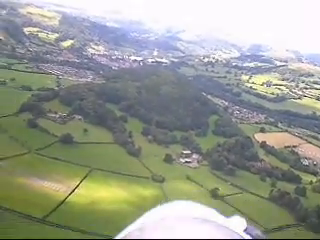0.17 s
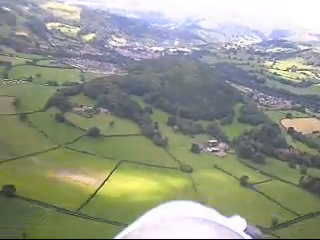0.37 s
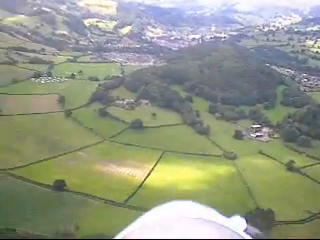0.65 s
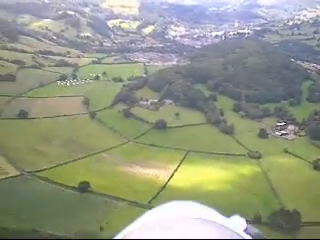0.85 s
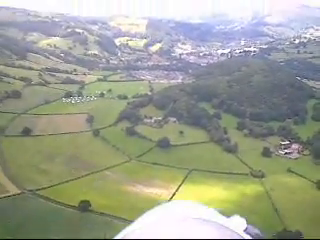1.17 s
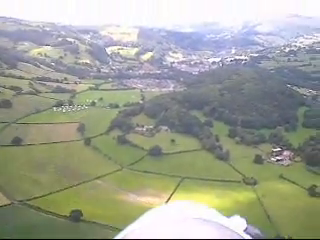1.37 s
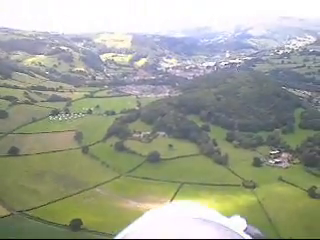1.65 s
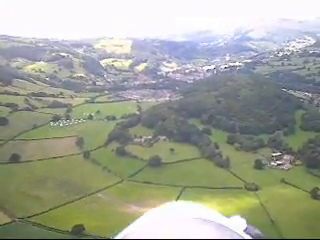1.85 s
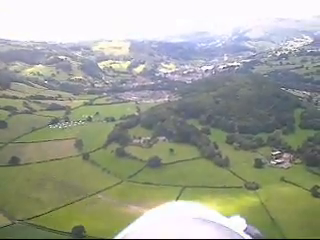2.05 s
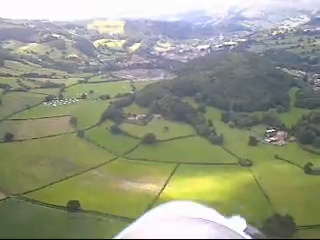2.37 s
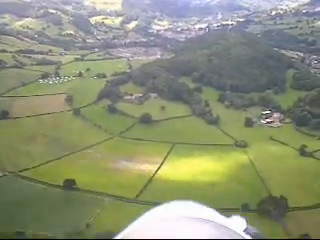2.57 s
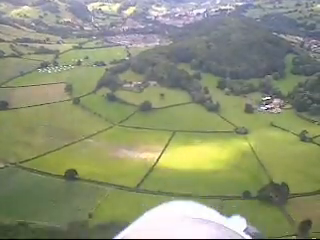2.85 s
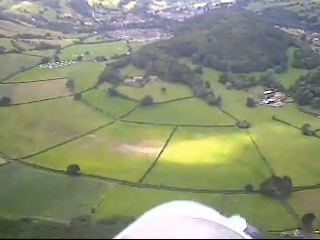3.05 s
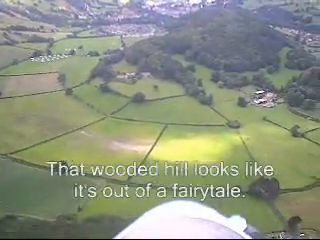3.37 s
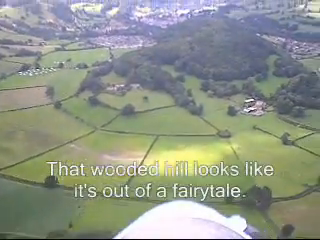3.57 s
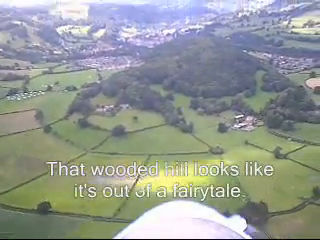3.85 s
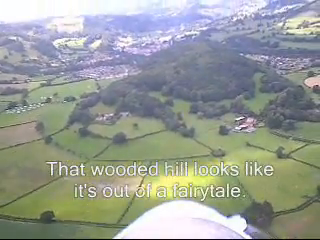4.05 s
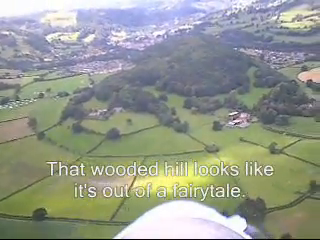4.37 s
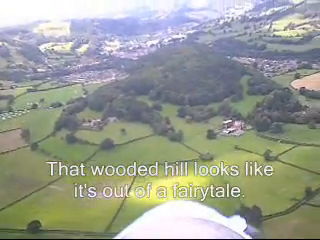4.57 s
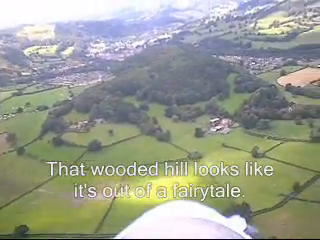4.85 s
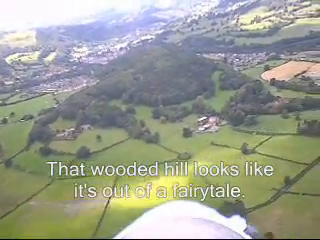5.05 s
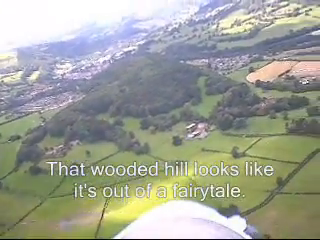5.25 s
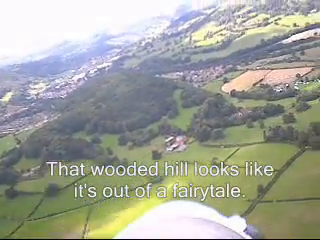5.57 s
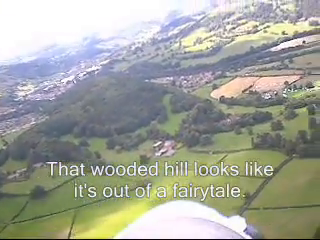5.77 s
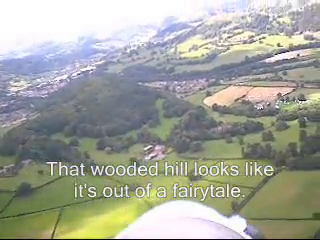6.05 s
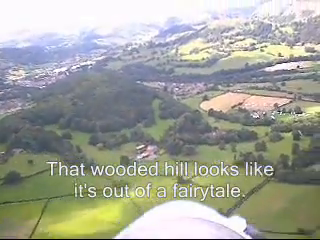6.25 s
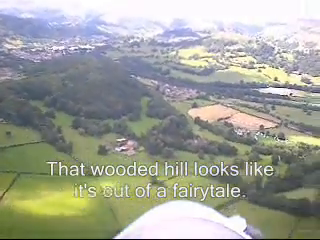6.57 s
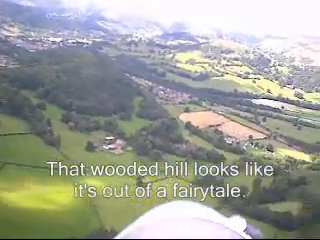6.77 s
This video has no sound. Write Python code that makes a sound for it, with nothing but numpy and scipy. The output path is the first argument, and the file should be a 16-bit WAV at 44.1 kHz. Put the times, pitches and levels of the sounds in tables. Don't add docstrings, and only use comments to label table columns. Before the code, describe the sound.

A close, low-quality microphone on a flying model glider is pummelled by air throughout. Deep, irregular buffeting clips into flat, crunchy thuds, with rougher mid-range rushing and a thin fizz above; slow sampling adds a gritty, metallic edge. From 0 to about 3.7 s a servo chatters almost continuously, some forty-five tiny twitches a second, each a short high gear whine and rattle, broken by little gaps. Stronger zips stand out near 0.1, 0.3, 0.9, 1.3, 1.5, 1.8, 2.1 and 3.45 s. The wind repeatedly fades for a fraction of a second, notably around 0.5, 0.6, 2.0, 2.4 and 3.0 s, exposing the servo, then bursts back. From 3.7 s the airflow swells and saturates, with a sharp slap at 4.15 s and brief drops near 4.5, 4.8 and 5.05 s. The servo is weaker and mostly buried, though it still twitches, until the abrupt end at 6.9 s.

```python
import sys
import numpy as np
from scipy import signal
from scipy.fft import rfft, irfft, next_fast_len
from scipy.io import wavfile
from scipy.ndimage import uniform_filter1d, map_coordinates

SR = 44100
rng = np.random.default_rng(int(sys.argv[2]) if len(sys.argv) > 2 else 0)


def master_out(mix):
    frames = np.transpose(np.atleast_2d(mix))
    ceiling = np.clip(frames, -1, 1)
    pcm = np.round(ceiling * 32767).astype(np.int16)
    wavfile.write(sys.argv[1], SR, pcm)


def to_linear_factor(level_db):
    exponent = np.asarray(level_db, float) / 20
    return 10 ** exponent


N = 305160

# frequency in Hz, width in Hz, level in dB.
CASE_MODES = [(1126, 380, -9), (1600, 295, -10), (2610, 244, -13), (2860, 237, 0.5), (2833, 754, -4)]
WHEEL_HZ = (2570, 2880)
# start in seconds, end in seconds, usual twitch peak in dB.
STEERING = [(0, .21, -20.5), (.23, .3, -25), (.3, .47, -22), (.47, .63, -23.5), (.63, 1.0, -20.5),
            (1.0, 1.18, -19), (1.2, 1.33, -23), (1.4, 1.66, -17.5), (1.69, 1.91, -20.5), (1.92, 2.21, -21),
            (2.23, 2.43, -22.5), (2.56, 2.76, -20), (2.78, 2.87, -21.5), (2.87, 3.07, -20.5),
            (3.16, 3.31, -26.5), (3.31, 3.73, -20.5), (3.84, 4.14, -27), (4.3, 4.57, -29.5),
            (4.59, 4.78, -24.5), (4.92, 5.31, -30.5), (5.58, 5.83, -26.5), (5.83, 6.1, -23.5),
            (6.1, 6.46, -28), (6.47, 6.7, -23), (6.72, 6.92, -23)]
IDLE_S = (.0246, .2242, .948, 1.629, 1.959, 2.003, 2.048, 2.795, 2.838, 3.278, 3.938, 4.091, 4.333, 4.377,
          4.619, 4.664, 5.015, 5.082, 5.235, 5.829, 6.116, 6.4, 6.51, 6.532, 6.599, 6.62, 6.687)
# peak time in seconds, peak in dB, gear whine in Hz.
JERKS = [(0.0688, -15.5, 2630), (.0906, -17.5, 2930), (.3105, -15, 2760), (0.6414, -19, 2880),
         (0.8824, -15.5, 2800), (1.278, -13, 2680), (1.3212, -9, 2780), (1.5193, -7.5, 2750),
         (1.7607, -10, 2780), (1.784, -16, 2750), (2.0261, -16, 2610), (2.0698, -14.5, 2760),
         (2.092, -9, 2830), (2.1583, -13.5, 2780), (2.2893, -16, 2700), (2.3767, -16.5, 2860),
         (2.665, -18.5, 2680), (3.0364, -18, 2950), (3.235, -16.5, 2880), (3.4534, -12, 2880),
         (3.6535, -19, 2760), (3.916, -15, 2880), (3.9794, -15, 2740), (4.113, -17, 2750), (4.6, -17, 3080),
         (5.061, -26.5, 2910), (5.4327, -23, 3000), (6.159, -20, 2950), (6.555, -18.5, 3170),
         (6.6636, -23, 2480)]
# frequency in Hz, level in dB per Hz.
BUFFET_SPECTRUM = [(8, -8), (25, -1.5), (60, 3.5), (160, 2.5), (260, -6.5), (450, -25.5), (900, -48)]
# frequency in Hz, level in dB per Hz.
EDDY_SPECTRUM = [(100, -4.5), (220, 10), (300, 5.5), (600, -2.5), (900, -18), (1500, -35), (3000, -52)]
# frequency in Hz, level in dB per Hz.
FIZZ_SPECTRUM = [(400, 4), (800, 3.5), (1200, -4), (1800, -12), (3000, -21), (4500, -12)]
# time in seconds, strength in dB, extra fine turbulence in dB.
FLOW = [(0, -2.5, -0.5), (.3, -0.5, 5), (.7, 0, -1), (1.1, -1.5, 4), (1.6, -1, -0.5), (1.9, 0, -1),
        (2.2, -3, -2), (2.6, -1.5, -3), (3.0, 0, -2), (3.3, -1, -1.5), (3.7, 3.5, 0.5), (4.15, 4.5, 0.5),
        (4.55, 4, -1), (5.0, 2.5, 1), (5.4, 4.5, -1.5), (5.75, 2, 2), (6.3, 1.5, 1), (6.92, 2.5, 1.5)]
# deepest point in seconds, fading time in seconds,
# fall of eddies in dB, fall of buffet in dB.
LULLS = [(.24, 0.047, 5.5, 10.5), (.33, 0.078, 4, 4.5), (.405, .06, 3, 5), (.5, .05, 14, 1),
         (.6, 0.043, 15, 6), (.86, .07, 13, 3.5), (.95, 0.025, 8, 0.5), (1.005, 0.011, 5, 11),
         (1.682, 0.023, 14, 7), (2.045, 0.053, 11, 1), (2.299, .025, 8, 4), (2.43, 0.085, 9, 5.5),
         (2.56, .035, 11, 5), (2.615, .03, 9, 10.5), (2.75, .05, 11, 2), (2.89, 0.01, 13, 6),
         (2.99, 0.04, 15, 7), (3.08, 0.014, 15, 7), (3.146, 0.025, 4.5, 2), (3.27, 0.061, 2, 2),
         (3.8, .015, 9, 3), (4.31, 0.036, 8, 7.5), (4.525, 0.017, 16, 2), (4.777, 0.016, 21, 8),
         (5.061, 0.01, 24, 7.5), (5.87, 0.019, 7, 6), (6.305, .015, 6, 2.5), (6.41, 0.0091, 3, -3),
         (6.565, 0.0079, 2, -4), (6.679, 0.019, 12, -2)]
# time in seconds, peak in dB.
SLAPS = [(2.442, -31), (2.5084, -37), (3.092, -34), (3.147, -43), (3.277, -38), (3.498, -30), (4.1547, -9),
         (4.1676, -20), (4.1918, -19), (4.5324, -49), (4.8904, -41), (5.0394, -26), (5.319, -25),
         (5.8731, -54), (5.9495, -31), (6.146, -28), (6.1975, -44), (6.57, -45)]

CEILING = 0.347


def unit(x):
    return x / np.sqrt(np.mean(x ** 2) + 1e-20)


def filtered(x, response):
    m = next_fast_len(N + 8192)
    return irfft(rfft(x, m) * response(np.fft.rfftfreq(m, 1 / SR)), m)[:N]


def smooth(x, rows, columns):
    return uniform_filter1d(uniform_filter1d(x, size=rows, axis=0), size=columns, axis=1)


def wobble(rate_hz):
    return map_coordinates(rng.standard_normal(2000), [np.arange(N) * rate_hz / SR])


def twitches():
    frame_s, first_s = 0.021987, 0.0024
    jitter_s, scatter_db, gear_hz, gear_spread_hz = 0.0005, 1.5, 2855, 112
    chance = np.clip(rng.standard_normal((int(N / SR / frame_s) + 1, 3)), -1.5, 1.5)
    start_s = first_s + frame_s * np.arange(len(chance))
    peak_db = np.full(len(start_s), -120.)
    for start, end, usual_db in STEERING:
        peak_db[(start_s >= start) & (start_s < end)] = usual_db
    rows = np.c_[start_s + jitter_s * chance[:, 0],
                 peak_db + scatter_db * chance[:, 1],
                 gear_hz + gear_spread_hz * chance[:, 2]]

    def nearest(s):
        return np.round((np.asarray(s) - first_s) / frame_s).astype(int)

    rows[nearest(IDLE_S), 1] -= 14
    rows[nearest(np.transpose(JERKS)[0])] = JERKS
    return rows


def case_response(f):
    total = 0
    for k, (centre_hz, width_hz, db) in enumerate(CASE_MODES):
        damping = 1j * f * width_hz
        total = total + (-1) ** k * to_linear_factor(db) * damping / (centre_hz * centre_hz - f * f + damping)
    return total


def servo():
    s, db, hz = np.transpose(twitches())[:, :, None]
    chance = rng.random((len(s), 6))
    u = np.arange(-300, 600) / SR
    rise_s = 0.0012 * (1.0 + 0.63 * chance[:, :1])
    fall_s = 0.0019 * (0.78 + 0.24 * chance[:, 1:2])
    kick = np.where(u < 0, np.exp(-(u / rise_s) ** 2 / 2), np.exp(-(np.abs(u) / fall_s) ** 0.93))

    low_hz, high_hz = np.minimum(hz, WHEEL_HZ[0]), np.maximum(hz, WHEEL_HZ[1])
    share = (hz - low_hz) / (high_hz - low_hz)
    phase = 2 * np.pi * chance[:, 2:3]
    slip = 1 + 0.031 * (chance[:, 3:5] - 0.5)
    low_wheel = np.sin(2 * np.pi * low_hz * slip[:, :1] * u + phase)
    high_wheel = np.sin(2 * np.pi * high_hz * slip[:, 1:] * u + phase)
    whine = (1 - share) * low_wheel + share * high_wheel

    at = np.clip(np.round((s + u) * SR).astype(int), 0, N - 1).ravel()
    tone = np.bincount(at, (to_linear_factor(db) * kick * whine).ravel(), N)
    run_on = 0.26 * (u > 0) * np.exp(-np.abs(u) / 0.0066)
    rattle_level = to_linear_factor(13 * (chance[:, 5:] - 1.0)) * kick + run_on
    rattle = np.bincount(at, (to_linear_factor(db) * rattle_level).ravel(), N)
    return to_linear_factor(1.0) * tone + to_linear_factor(16.5) * filtered(rattle * rng.standard_normal(N), case_response)


def rush(spectrum, patchy_db):
    z = signal.stft(rng.standard_normal(N), nperseg=1024)[2]
    patches = unit(smooth(rng.standard_normal(z.shape), 6, 4))
    x = signal.istft(z * to_linear_factor(patchy_db * patches), nperseg=1024)[1][:N]
    hz, db = np.transpose(spectrum)
    x = filtered(x, lambda f: to_linear_factor(np.interp(np.log(f + 1), np.log(hz), db, -120, -120)))
    power = np.abs(uniform_filter1d(uniform_filter1d(x ** 2, size=3000), size=3000))
    return unit(x / power ** 1.25)


def lulls():
    return_s = 0.012
    t = np.arange(0, N / SR, 0.001)
    falls = []
    for s, fade_s, *depths_db in LULLS:
        shape = np.exp(-np.where(t < s, (s - t) / fade_s, (t - s) / return_s) ** 2)
        falls.append(np.outer(depths_db, shape))
    return [np.interp(np.arange(N) / SR, t, db) for db in np.max(falls, axis=0)]


def airflow():
    s, *controls = np.transpose(FLOW)
    strength_db, fine_db = (np.interp(np.arange(N) / SR, s, db) for db in controls)
    eddy_lull_db, buffet_lull_db = lulls()
    buffet_db = -17 + 0.33 * strength_db - buffet_lull_db
    eddy_db = -21 + 0.86 * strength_db - eddy_lull_db
    fizz_db = -37 + 1.5 * strength_db + fine_db - 0.39 * eddy_lull_db
    speed_db = uniform_filter1d(buffet_db, size=SR // 4)
    overload_db = 0.94 * np.maximum(speed_db + 21.5, 0)

    gust, lumps = wobble(22), wobble(70)
    buffet = unit(to_linear_factor(1.35 * gust) * rush(BUFFET_SPECTRUM, patchy_db=-1.0))
    eddies = unit(to_linear_factor(1.24 * gust + 1.63 * lumps) * rush(EDDY_SPECTRUM, patchy_db=0.5))
    flicker_db = 1.95 * gust + 0.85 * lumps + 3.6 * wobble(200)
    fizz = unit(to_linear_factor(flicker_db) * rush(FIZZ_SPECTRUM, patchy_db=0.9))
    flow = to_linear_factor(buffet_db) * buffet + to_linear_factor(eddy_db) * eddies + to_linear_factor(fizz_db + 2.5) * fizz
    return to_linear_factor(overload_db) * flow


def slaps(air):
    s, db = np.transpose(SLAPS)
    hit = rng.random(N) < 40 / SR
    steps = hit * np.abs(rng.standard_normal(N)) * to_linear_factor(-2.5) * np.abs(air)
    at = np.round(s * SR).astype(int)
    steps[at] = to_linear_factor(db + 18) + 0.47 * np.maximum(np.abs(air[at]) - CEILING, 0)
    leak_hz = 90
    return filtered(-np.sign(air) * steps, lambda f: SR / (2 * np.pi * (leak_hz + 1j * f)))


def scene():
    air = airflow()
    return (air + slaps(air) + servo())[None]


def low_pass(x):
    return signal.sosfilt(signal.butter(12, 13370, fs=SR, output="sos"), x)


def record(dry):
    hold_hz, hiss_db = 7997.8, -70
    x = dry[0] - 0.018
    x = x / (1 + np.abs(x / CEILING) ** 9) ** (1 / 9)
    x = x - 0.023 * filtered(x, lambda f: 1 / (1 + 1j * f / 45))
    x = filtered(x, lambda f: 1 / (1 + (f / 3900) ** 12))
    x = x + to_linear_factor(hiss_db) * rng.standard_normal(N)
    tick = np.floor(np.arange(N) * hold_hz / SR) * SR / hold_hz
    held = np.interp(tick, np.arange(N), x)
    return low_pass(held)


dry = scene()
out = record(dry)
master_out(out)
```